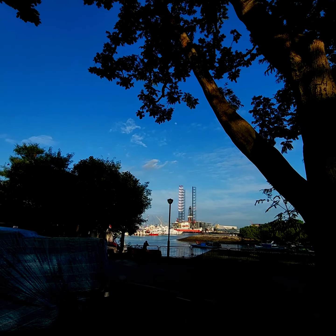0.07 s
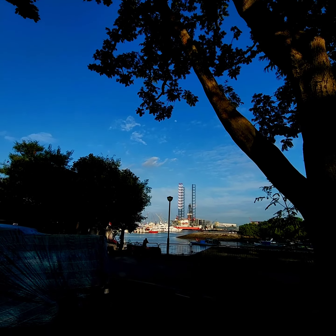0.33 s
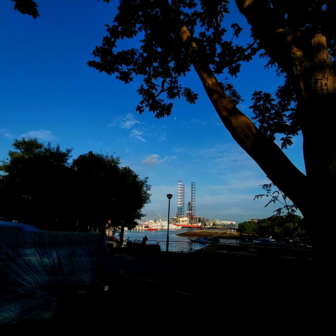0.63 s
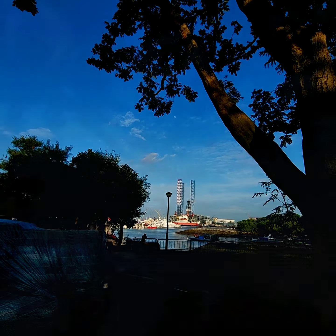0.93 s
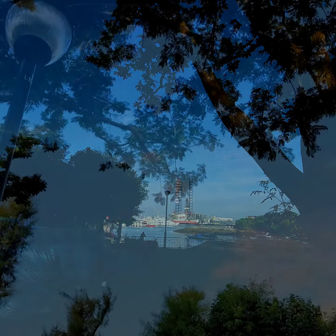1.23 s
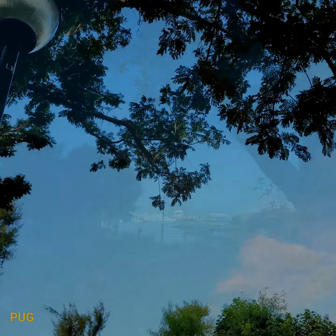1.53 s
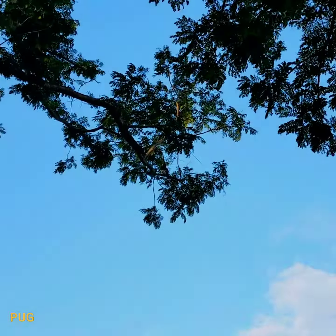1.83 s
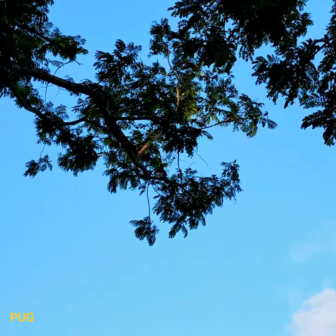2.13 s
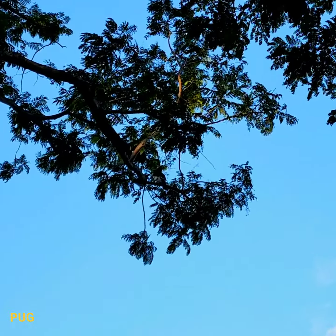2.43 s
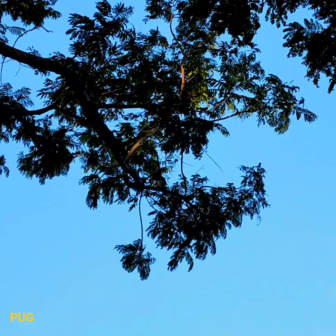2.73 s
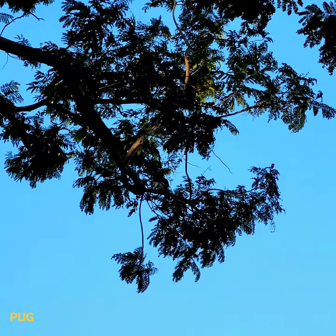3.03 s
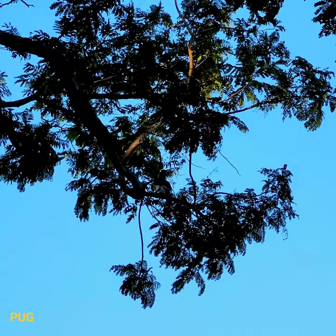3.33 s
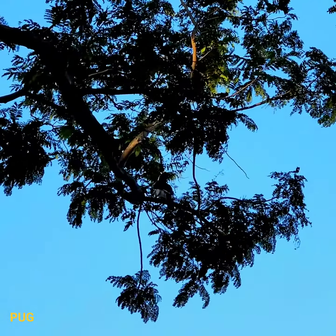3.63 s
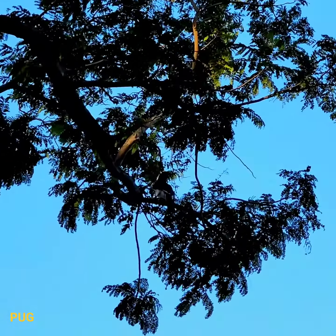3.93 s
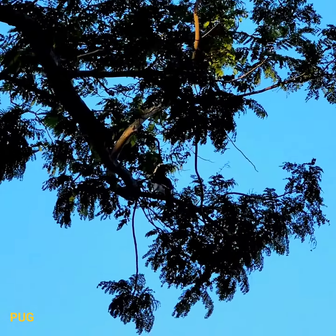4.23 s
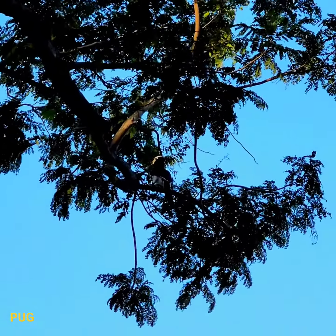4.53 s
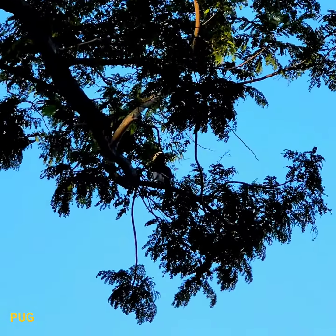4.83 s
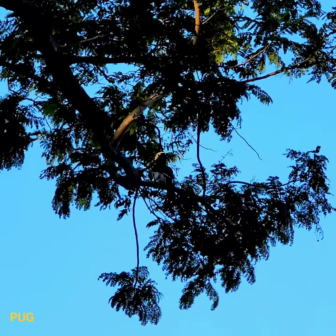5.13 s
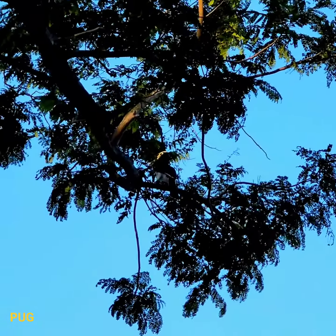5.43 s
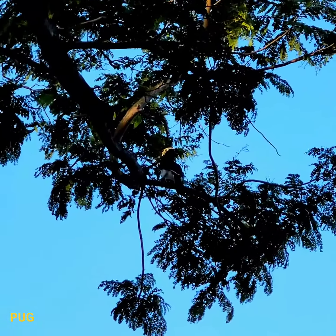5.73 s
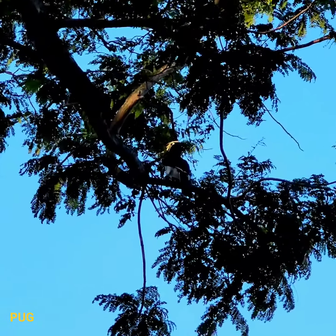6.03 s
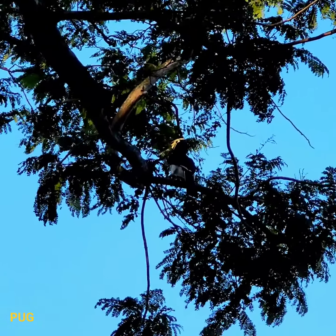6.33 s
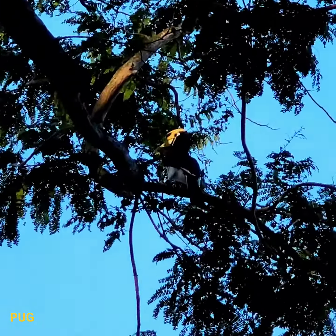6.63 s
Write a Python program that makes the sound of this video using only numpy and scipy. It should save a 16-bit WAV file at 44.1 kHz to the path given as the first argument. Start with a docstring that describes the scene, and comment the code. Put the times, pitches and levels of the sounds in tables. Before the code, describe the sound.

Distant traffic rumbles under shrill insects and thin chirps, then a hornbill yelps briefly several times among the leaves.

```python
"""First you hear a steady hiss, distant traffic, a trilling insect, small birds and one sharp click.
After a short silence the scene moves close to a waterside tree, where the traffic rumbles more heavily,
a bird chatters and thin insect whines keep sinking. From about 4 s comes the main sound: a hornbill
gives seven short yelps that echo among the trunks and scatter in the leaves.
The animal voices are sliding sine tones; the traffic and the hiss are mostly shaped noise."""
import sys
import numpy as np
from scipy import signal
from scipy.fft import rfft, irfft, next_fast_len
from scipy.io import wavfile
from scipy.ndimage import map_coordinates

SR = 44100
rng = np.random.default_rng(int(sys.argv[2]) if len(sys.argv) > 2 else 0)


def to_wav(s):
    """Save 16-bit WAV."""
    ch = np.atleast_2d(s).T  # columns
    pcm = np.round(np.clip(ch, -1, 1) * 32767)  # PCM
    wavfile.write(sys.argv[1], SR, pcm.astype(np.int16))


N = 294147
GAP_START_S, GAP_END_S = 1.421, 1.497  # the silence between the far scene and the close one


# echoes from the trunks and the ground: delay/s, level/dB
TRUNK_ECHOES = [(0.015, -15.5), (0.032, -21), (.07, -25), (.1, -26)]

def hornbill(top_scatter_db=-16.5, low_scatter_db=-24, reed_scatter_db=-5, uneven_db=3):
    """The yelps arrive directly, bounce raggedly off the trunks and linger in the leaves."""
    top = yelp_notes()
    low, reed = hoarse_notes()
    voice = top + low + reed
    echoes = np.zeros((2, N))
    for delay, db in TRUNK_ECHOES:
        for ear in echoes:
            add(ear, delay, amp(db + uneven_db * wobble(160)) * voice)
    scatter = foliage(amp(top_scatter_db) * top + amp(low_scatter_db) * low, t60=1.0)
    # leaves scatter the short waves of the overtones most
    scatter += amp(reed_scatter_db) * foliage(reed, t60=.5)
    return voice + echoes + scatter


# the hornbill's yelps: t/s, length/s, f/Hz, level/dB, roughness (0-1), share of pitch lost per second
YELP_NOTES = [(4.141, .018, 1440, -39.5, .18, 1.4), (4.721, .034, 1454, -32, .11, 1.1),
              (5.036, .033, 1447, -37.5, .14, 1.0), (5.33, .033, 1473, -28.5, .09, 1.1),
              (5.601, .034, 1471, -34.5, .07, 1.15), (5.879, .033, 1481, -29, .05, 1.0),
              (6.531, .036, 1498, -23.8, .03, .7)]

def yelp_notes(overshoot=.07, settle_s=.002, octave_db=-33):
    """The nearly pure top note of each yelp starts a little high, settles at once and sags."""
    voice = np.zeros(N)
    for s, length, hz, db, rough, sag in YELP_NOTES:
        t = clock(length)
        jitter, shimmer = flutter(t)
        bend = 1 + overshoot * np.exp(-t / settle_s) - sag * t + rough * jitter / 10
        phase = phase_of(hz * bend)
        tone = np.sin(phase) + amp(octave_db) * np.sin(2 * phase)
        swell = arch(t / length, skew=.85, power=1.4) * (1 + rough * shimmer)
        add(voice, s, np.sqrt(2) * amp(db) * swell * tone)
    return voice


# breaks in the voice: t/s, length/s, f/Hz, level/dB, 2nd harmonic/dB, 3rd harmonic/dB, roughness (0-1)
VOICE_BREAKS = [(4.142, .046, 1280, -34.5, -20, -13, .3), (4.738, .029, 1235, -40.5, -24, -12.5, .3),
                (5.056, .026, 1280, -49, -20, -21, .35), (5.617, .028, 1305, -47.5, -22, -24, .35)]

def hoarse_notes(sag_per_s=3.1, jitter_share=.06):
    """The voice breaks to a lower, reedy note; returns its base tone and its overtones."""
    low, reed = np.zeros(N), np.zeros(N)
    for s, length, hz, db, second_db, third_db, rough in VOICE_BREAKS:
        t = clock(length)
        jitter, shimmer = flutter(t)
        phase = phase_of(hz * (1 - sag_per_s * t + rough * jitter_share * jitter))
        size = np.sqrt(2) * amp(db) * (1 + rough * shimmer)
        add(low, s, size * arch(t / length, skew=.75, power=2) * np.sin(phase))
        # the overtones open up late, as the pitch falls
        overtones = amp(second_db) * np.sin(2 * phase) + amp(third_db) * np.sin(3 * phase)
        add(reed, s, size * arch(t / length, skew=1.85, power=.6) * overtones)
    return low, reed


# a small bird's phrase: delay/s, length/s, start f/Hz, end f/Hz, level/dB, extra leaf scatter/dB
BIRD_PHRASE = [(0, .03, 8200, 7350, -58, -2), (.018, .05, 7560, 7330, -61, 5),
               (.2, .03, 8200, 7000, -54, -6)]
# when the phrase begins: t/s
PHRASE_TIMES = [.028, .427, .872]
# lower sliding notes: t/s, level/dB
BIRD_SLIDES = [(0, -55), (.24, -52), (.415, -54.5), (.634, -51.5), (.808, -54)]
# thin, very quick ticks: t/s, level/dB
BIRD_TICKS = [(1.55, -63), (1.913, -54.5), (2.27, -57), (2.625, -60), (2.968, -52)]
# stray whistles: t/s, length/s, start f/Hz, end f/Hz, level/dB
BIRD_WHISTLES = [(0.066, 0.067, 4020, 3870, -51.5), (0.412, 0.023, 4220, 3780, -53),
                 (2.973, 0.012, 4150, 3000, -47.5), (5.093, 0.022, 2440, 2060, -49)]

def small_birds(rasp=.02, length_spread=.18, pitch_spread=.013, direct_db=-5, scatter_db=-3.5):
    """High, falling notes, most of them scratchy, half lost in the leaves."""
    song, leaves = np.zeros(N), np.zeros(N)
    def sing(s, note, song_db, leaves_db):
        add(song, s, amp(song_db) * note)
        add(leaves, s, amp(leaves_db) * note)
    def varied_note(length, start_hz, end_hz):
        stretch, shift = 1 + rng.standard_normal(2) * [length_spread, pitch_spread]
        return glide(length * abs(stretch), start_hz * shift, end_hz * shift, rasp)
    for s in PHRASE_TIMES:
        for delay, length, start_hz, end_hz, db, extra_db in BIRD_PHRASE:
            sing(s + delay, varied_note(length, start_hz, end_hz), db, db + extra_db)
    for s, db in BIRD_SLIDES:
        sing(s, varied_note(length=.058, start_hz=7000, end_hz=6230), db - 4, db)
    for s, db in BIRD_TICKS:
        sing(s, glide(length=.015, start_hz=8400, end_hz=6500), db, db - 3)
    for s, length, start_hz, end_hz, db in BIRD_WHISTLES:
        sing(s, glide(length, start_hz, end_hz, rasp), db, db - 3)
    return amp(direct_db) * song + amp(scatter_db) * foliage(leaves, t60=.17)


# brief, faint hoots: t/s, level/dB
BIRD_HOOTS = [(3.461, -48.5), (5.483, -50)]

def clear_calls():
    """Far-off birds give one slowly rising whistle and two low hoots, all pure tones."""
    calls = np.zeros(N)
    add(calls, 1.26, amp(-60.5) * glide(length=.3, start_hz=1784, end_hz=1990))
    for s, db in BIRD_HOOTS:
        add(calls, s, amp(db) * glide(length=.036, start_hz=587, end_hz=587))
    return calls


# single falling chirps: t/s, level/dB
CHIRPS = [(4.235, -60), (4.465, -61), (4.505, -59), (4.703, -59), (4.735, -61), (4.975, -59), (5.012, -58),
          (5.245, -60)]
# bouts of chatter: t/s, number of notes, time between notes/s, level/dB
CHATTER_BOUTS = [(1.4, 7, .243, -57), (6.09, 3, 0.21, -55.5)]

def chattering_bird(chirp_s=.0138, note_s=.21, note_hz=5200, pitch_spread=.055, chirps_per_s=130):
    """A bird on the right gives dry chirps, and rasping notes that are swarms of such chirps."""
    chirps, rasps = np.zeros(N), np.zeros(N)
    for s, db in CHIRPS:
        add(chirps, s, amp(db) * glide(chirp_s, start_hz=5670, end_hz=5150))
    for start, notes, gap, db in CHATTER_BOUTS:
        for s in start + gap * np.arange(round(notes)):
            for delay in np.arange(0, note_s, 1 / chirps_per_s):
                hz = note_hz * (1 + pitch_spread * rng.standard_normal())
                swell = np.sin(np.pi * delay / note_s)
                add(rasps, s + delay, amp(db) * swell * glide(chirp_s, hz + 260, hz - 260))
    return (chirps + amp(.5) * foliage(rasps, t60=.27)) * ears(left_db=-6, right_db=2)


# an insect's trills: t/s, number of pulses, f/Hz, level/dB
INSECT_TRILLS = [(0, 12, 4700, -62), (.58, 10, 4720, -55), (1.129, 6, 4440, -55.5)]

def trilling_insect(gap_s=.045, pulse_s=.021, uneven_db=1, pitch_spread=.006, fall=.045):
    """Even trains of short, scratchy falling pulses, a little blurred by the leaves."""
    pulses = np.zeros(N)
    for start, count, hz, db in INSECT_TRILLS:
        for s in start + gap_s * np.arange(round(count)):
            size, shift = rng.standard_normal(2)
            pitch = hz * (1 + pitch_spread * shift)
            pulse = glide(pulse_s, pitch * (1 + fall), pitch * (1 - fall), rasp=.025)
            add(pulses, s, amp(db + uneven_db * size) * pulse)
    return (pulses + amp(-3) * foliage(pulses, t60=.2)) * ears(left_db=-4, right_db=3)


# sinking whines of two insects: end t/s, length/s, final f/Hz, level/dB
SINKING_WHINES = [(1.97, 1.0, 5990, -66), (2.52, .7, 5790, -78), (3.17, .8, 5992, -68),
                  (3.92, .8, 5795, -78), (4.3, .8, 5997, -69.5), (5.42, .85, 5990, -69.5),
                  (5.5, 1.1, 5785, -77), (6.45, .8, 5992, -70.5), (6.8, .8, 5785, -76)]

def whining_insects(held_hz=6060, sag_hz_per_s=165, waver_hz=7, release_s=.04, flutter_db=3):
    """Thin tones with an octave on the right: the first holds its pitch, the rest sink and stop short."""
    base, octave = np.zeros(N), np.zeros(N)
    add(base, 0, amp(-69.5) * glide(GAP_START_S, held_hz, held_hz))
    add(octave, 0, amp(-82.5) * glide(GAP_START_S, 2 * held_hz, 2 * held_hz))
    for end, length, end_hz, db in SINKING_WHINES:
        t = clock(length)
        phase = phase_of(end_hz + sag_hz_per_s * (length - t) + waver_hz * wobble(70)[:len(t)])
        size = amp(db) * np.minimum(2 * t / length, 1) * np.minimum((length - t) / release_s, 1)
        add(base, end - length, size * np.sin(phase))
        add(octave, end - length, amp(-2) * size * np.sin(2 * phase))
    return (base + octave * ears(left_db=-5, right_db=3)) * amp(flutter_db * wobble(22))


# sharp clicks: t/s, level/dB, time to fade by 60 dB/s
SHARP_CLICKS = [(.5588, -33.5, .016), (.5606, -31, .009), (.562, -19.3, .006), (2.974, -51, .025),
                (5.872, -46, .015)]
# the tone colour of a click: f/Hz, level/dB
CLICK_TONE = [(100, -10), (200, 2), (350, 2), (700, 0), (1100, -5), (2000, -11.5), (2700, -10.5),
              (3200, -7.5), (3900, -15), (4770, -4.5), (5400, -15), (7600, -11), (9000, -16.5),
              (12000, -20), (16000, -34)]

def handling_clicks(push_db=7, push_s=.00005, grit_db=-6, ring_db=-17, ring_t60=.06):
    """Each click is a sudden push, a burst of grit and a short hollow ring."""
    ring_tone = [(100, -10), (250, 1), (750, -10), (1500, -14.5), (5000, -28), (13000, -49)]  # f/Hz, dB
    snaps, ring = np.zeros(N), np.zeros(N)
    t = clock(.2)
    for s, db, t60 in SHARP_CLICKS:
        add(snaps, s, amp(db + grit_db - 60 * t / t60) * rng.standard_normal(len(t)))
        add(snaps, s, -amp(db + push_db) * np.exp(-t / push_s))
        add(ring, s, amp(db + ring_db - 60 * t / ring_t60) * rng.standard_normal(len(t)))
    crack = filtered(snaps, lambda hz: unit(amp(along(CLICK_TONE, hz))))
    hollow = filtered(ring, lambda hz: unit(amp(along(ring_tone, hz))))
    return crack + hollow


# soft bumps: t/s, f/Hz, level/dB, time to fade by 60 dB/s
SOFT_BUMPS = [(.5616, 194, -20, .03), (2.015, 80, -14.5, .13), (5.349, 76.6, -10.5, .24),
              (6.269, 76.4, -18, .05), (6.372, 294, -20, .074)]

def handling_bumps():
    """Each bump sets off a low tone that dies away quickly."""
    thuds = np.zeros(N)
    t = clock(.2)
    for s, hz, db, t60 in SOFT_BUMPS:
        onset = 1 - np.exp(-2 * hz * t)
        add(thuds, s, amp(db - 60 * t / t60) * onset * np.sin(2 * np.pi * hz * t))
    return thuds


# the traffic's rumble in the close scene: t/s, deep level/dB, body level/dB
RUMBLE_LEVELS = [(1.55, -36.5, -41.5), (1.88, -36.5, -41), (1.99, -29.5, -32.5), (2.55, -29.5, -36.5),
                 (2.77, -28, -32.5), (2.99, -30, -36), (3.21, -30.5, -31.5), (4.21, -29, -32),
                 (4.32, -28.5, -29.5), (4.98, -24.5, -31.5), (5.2, -26.5, -29), (5.98, -32, -34),
                 (6.31, -26, -30.5), (6.64, -32, -29.5)]
# brief swells of that rumble: t/s, length/s, rise/dB
RUMBLE_SWELLS = [(2.023, .04, 7.5), (3.257, .071, 6.5), (3.355, .027, 3.5), (3.897, .07, 4),
                 (4.796, .076, 3), (5.233, .19, 3), (6.267, .043, 4.5)]
# the drone above the rumble: t/s, level/dB
DRONE_LEVELS = [(1.55, -55.5), (2.3, -53.5), (3, -55), (3.6, -52.5), (4.1, -43), (4.7, -52), (5.35, -42.5),
                (5.8, -45), (6.2, -44), (6.6, -41)]
# the road noise above the drone: t/s, level/dB
ROAD_LEVELS = [(1.5, -59), (2.3, -56.5), (3.2, -56), (3.6, -56), (4.05, -50), (4.3, -55.5), (5, -55),
               (5.45, -54.5), (6, -55), (6.4, -53), (6.67, -53.5)]
# the traffic's tone colour: f/Hz, level/dB
NEAR_TRAFFIC_TONE = [(20, -5.5), (40, -2), (60, 0.5), (80, 1), (110, -1.5), (160, -4.5), (230, -14.5),
                     (300, -27.5), (400, -32.5), (520, -35.5), (700, -36), (850, -41), (1000, -52.5)]
# how alike it is in the two ears: f/Hz, likeness (1 = the same)
NEAR_LIKENESS = [(40, .62), (110, .5), (250, .48), (700, .3)]

def near_rumble(lumpy_db=.5):
    """Traffic as four bands of noise that swell and fade: deep rumble, body, drone and road noise."""
    bands_hz = [(20, 110), (110, 250), (250, 380), (380, 1000)]
    t = np.arange(N) / SR
    swell_db = sum(rise * np.exp(-(2 * (t - s) / length) ** 2) for s, length, rise in RUMBLE_SWELLS)
    levels = [db + swell_db for db in curves(RUMBLE_LEVELS)] + curves(DRONE_LEVELS) + curves(ROAD_LEVELS)
    return sum(amp(db + lumpy_db * wobble(14)) * stereo_noise(NEAR_TRAFFIC_TONE, NEAR_LIKENESS, *band)
               for db, band in zip(levels, bands_hz))


# the tones of a low hum: f/Hz, level/dB compared with the rumble's body
HUM_TONES = [(160, -5.5), (200, -11), (238, -14.5), (279, -19.5), (301, -23.5)]

def hum(drift_hz=2.533, waver_db=3.5):
    """Low, wavering tones that rise and fall with the rumble's body."""
    body_db = curves(RUMBLE_LEVELS)[1]
    tones = sum(amp(db + waver_db * wobble(7)) * np.sin(phase_of(hz + drift_hz * wobble(9)))
                for hz, db in HUM_TONES)
    return amp(body_db) * tones


# which side the traffic is on: t/s, left minus right level/dB
TRAFFIC_SIDE = [(1.55, -4), (1.93, -5), (2.02, 0), (6.6, 0)]

def near_traffic():
    """Rumble and hum start a little to the right, then move to the middle."""
    pan_db, = curves(TRAFFIC_SIDE)
    return (near_rumble() + hum()) * amp([pan_db / 2, -pan_db / 2])


# the deep rumble in the far scene: t/s, level/dB
FAR_RUMBLE_LEVELS = [(0.0, -31), (0.34, -35), (0.8, -32), (1.03, -34.5), (1.26, -28), (1.38, -38.5)]
# the far traffic's tone colour: f/Hz, level/dB
FAR_TRAFFIC_TONE = [(15, -27), (25, -12), (40, -1), (58, 6.5), (100, -6.5), (150, -17), (200, -23.5),
                    (260, -29), (400, -31.5), (560, -35), (730, -31.5), (850, -38), (1300, -40),
                    (2000, -76)]
# how alike it is in the two ears: f/Hz, likeness (1 = the same, -1 or less = opposite)
FAR_LIKENESS = [(60, 0.99), (130, 0.99), (290, 0.82), (640, 0.36), (1400, -1.19)]

def far_traffic(split_hz=110, wash_db=-41):
    """Traffic across the water: a swelling deep rumble under an even wash of noise."""
    deep = stereo_noise(FAR_TRAFFIC_TONE, FAR_LIKENESS, 0, split_hz)
    wash = stereo_noise(FAR_TRAFFIC_TONE, FAR_LIKENESS, split_hz, SR / 2)
    return amp(curves(FAR_RUMBLE_LEVELS)[0]) * deep + amp(wash_db) * wash


# the opening rustle: t/s, level/dB
RUSTLE_LEVELS = [(0, -54), (.1, -54), (.25, -55), (.42, -54.5), (.6, -66), (.9, -80)]

def rustle(centre_hz=3650, width_hz=650):
    """A band of flickering noise makes a brief dry rasp on the right."""
    white = rng.standard_normal((2, N))
    noise = unit(filtered(white, lambda hz: np.exp(-((hz - centre_hz) / width_hz) ** 2)))
    return noise * amp(curves(RUSTLE_LEVELS)[0] + wobble(70)) * ears(left_db=-4, right_db=2)


# the tone colour of each scene's hiss: f/Hz, left level/dB, right level/dB
FAR_HISS_TONE = [(300, 2.5, -18), (1000, -2, -3), (2240, -4.5, -0.5), (4160, -14, -5), (4430, -3.5, 4),
                 (5700, -7.5, -17), (6400, -4, -12), (7140, -22, -20), (8800, -6.5, -14.5),
                 (9600, -12.5, -19.5), (10440, -8, -10.5), (11200, -32, -16.5), (12500, -20, -1.5),
                 (13500, -52, -32), (14500, -60, -48)]
NEAR_HISS_TONE = [(280, 1.5, 2), (1000, 0.5, 2), (2190, -1.5, -1), (4090, -10.5, -7), (4610, -22, 3.5),
                  (5000, -23, -1), (6470, -7, -8), (7240, -32, -12), (8460, -7, -14), (9740, -15.5, -16),
                  (10500, -12.5, -15.5), (11000, -28, -20), (12500, -19, -17.5), (13500, -33, -33)]
# shrill, insect-like bands in the hiss: f/Hz, width/Hz, left level/dB, right level/dB
FAR_SHRILL_BANDS = [(3093, 145, -2, 7), (4810, 170, 3, 4.5), (6166, 150, 7, 7), (7280, 140, -3, -2.5),
                    (9040, 380, -9, -10), (12120, 260, -7, 5)]
NEAR_SHRILL_BANDS = [(3062, 147, 3, 3), (4798, 160, 4.5, 7), (6180, 190, -10, 3), (7410, 440, -19, -8.5),
                     (8920, 260, -10.5, -9.5), (12080, 280, -25, -5.5)]

def hiss(tone, bands, level_db):
    """Steady broad noise with narrow shrill bands, different in each ear."""
    def colour(hz, side):
        power = amp(along([(row[0], row[1 + side]) for row in tone], hz)) ** 2
        for centre, width, *db in bands:
            power += amp(db[side]) ** 2 / (1 + ((hz - centre) / (.75 * width)) ** 2) ** 3
        return np.sqrt(power)
    white = rng.standard_normal((2, N))
    return amp(level_db) * filtered(white, lambda hz: np.array([colour(hz, 0), colour(hz, 1)]))


def foliage(x, t60):
    """Leaves and branches scatter a sound into a soft tail that fades by 60 dB in t60 seconds."""
    t = clock(1.0)
    tail = rng.standard_normal((2, len(t))) * amp(-60 * t / t60) * (1 - np.exp(-t / .01))
    return signal.fftconvolve(x[None], tail / np.linalg.norm(tail[0]), axes=1)[:, :N]


def glide(length, start_hz, end_hz, rasp=0):
    """A whistle that swells, slides and fades; rasp is the share by which its pitch trembles."""
    t = clock(length)
    progress = t / length
    tremble = map_coordinates(rng.standard_normal(int(length * 900) + 4), [t * 900]) if rasp else 0
    hz = (start_hz + (end_hz - start_hz) * progress) * (1 + rasp * tremble)
    return np.sqrt(2 * np.sin(np.pi * progress)) * np.sin(phase_of(hz))


def stereo_noise(tone, likeness, low_hz, high_hz):
    """A band of noise: one part is the same in both ears (mid), the other is opposite (side)."""
    def colour(hz):
        angle = np.arccos(np.clip(along(likeness, hz), -1, 1)) / 2
        in_band = (hz >= low_hz) * (hz < high_hz)
        return amp(along(tone, hz)) * in_band * np.array([np.cos(angle), np.sin(angle)])
    mid, side = filtered(rng.standard_normal((2, N)), colour)
    return np.array([mid + side, mid - side]) / np.std(mid)


def flutter(t):
    """The fast shake of a voice: one curve for its pitch, one for its loudness."""
    return map_coordinates(rng.standard_normal(120), [np.array([t, t + .1]) * 450])


def wobble(rate):
    """A smooth curve through `rate` random values a second."""
    return map_coordinates(rng.standard_normal(int(N * rate / SR) + 4), [np.arange(N) * rate / SR])


def arch(progress, skew, power):
    """A rise and fall; more skew puts the peak later, more power narrows it."""
    return np.abs(np.sin(np.pi * progress ** skew)) ** power


def amp(db):
    """Turn decibels into a multiplier."""
    return 10 ** (np.asarray(db) / 20)


def ears(left_db, right_db):
    """One multiplier for each ear."""
    return amp([[left_db], [right_db]])


def unit(x):
    """Scale x to an average power of 1."""
    return x / np.sqrt(np.mean(x ** 2) + 1e-20)


def along(points, hz):
    """Read between (f/Hz, value) points on a logarithmic frequency scale."""
    freqs, values = np.transpose(points)
    return np.interp(np.log(hz + 1), np.log(freqs + 1), values)


def curves(rows):
    """One value per sample for each column after the time."""
    times, *columns = np.transpose(rows)
    return [np.interp(np.arange(N) / SR, times, column) for column in columns]


def filtered(x, response):
    """Multiply each frequency in x by response(hz)."""
    size = next_fast_len(N + SR // 2)
    return irfft(rfft(x, size) * response(np.fft.rfftfreq(size, 1 / SR)), size)[..., :N]


def clock(length):
    """The sample times of one event, in seconds."""
    return np.arange(int(length * SR)) / SR


def add(track, s, sound):
    """Mix a sound in at s seconds."""
    part = track[max(round(s * SR), 0):][:len(sound)]
    part += sound[:len(part)]


def phase_of(hz):
    """The running phase of a moving pitch."""
    return 2 * np.pi * np.cumsum(hz) / SR


def scene():
    """The far scene, a short silence, then the scene close to the tree."""
    t = np.arange(N) / SR
    far = far_traffic() + hiss(FAR_HISS_TONE, FAR_SHRILL_BANDS, level_db=-42.5)
    far += rustle() + trilling_insect()
    near = near_traffic() + hiss(NEAR_HISS_TONE, NEAR_SHRILL_BANDS, level_db=-43)
    animals = hornbill() + small_birds() + clear_calls() + chattering_bird() + whining_insects()
    events = animals + handling_clicks() + handling_bumps()
    return (far + events) * (t < GAP_START_S) + (near + events) * (t >= GAP_END_S)


def record(dry, top_hz=15750):
    """Remove the very highest treble."""
    return filtered(dry, lambda hz: hz < top_hz)


dry = scene()
out = record(dry)
to_wav(out)
```